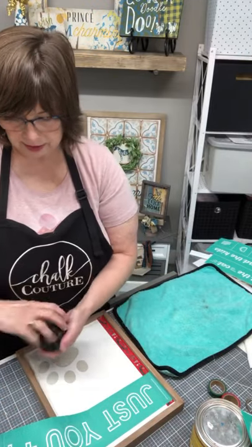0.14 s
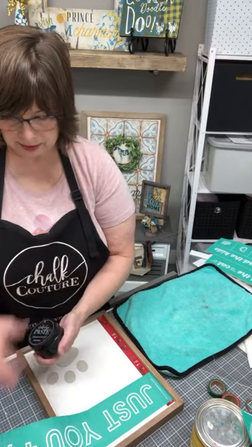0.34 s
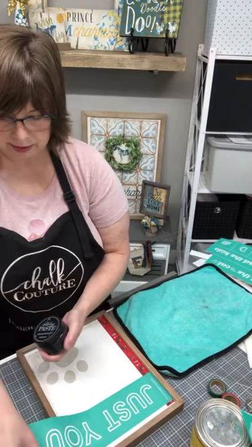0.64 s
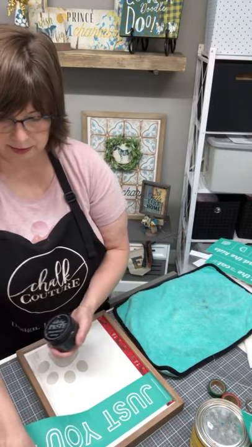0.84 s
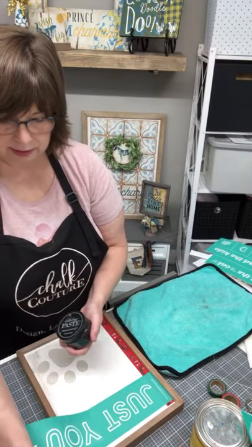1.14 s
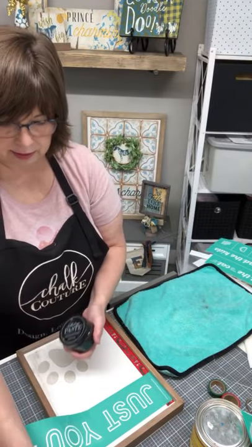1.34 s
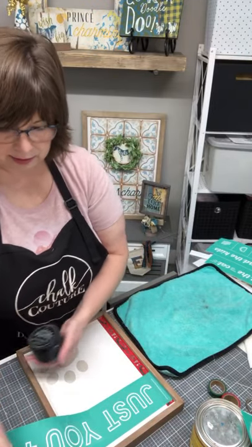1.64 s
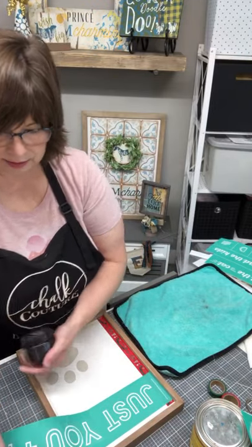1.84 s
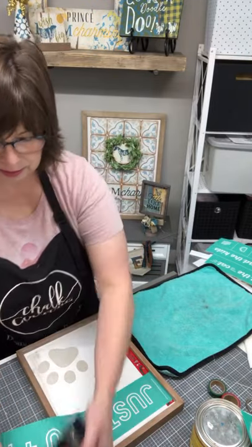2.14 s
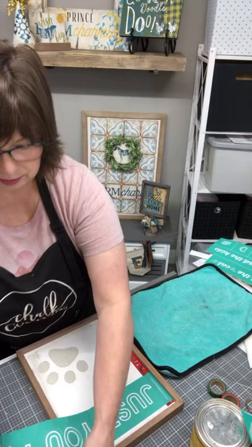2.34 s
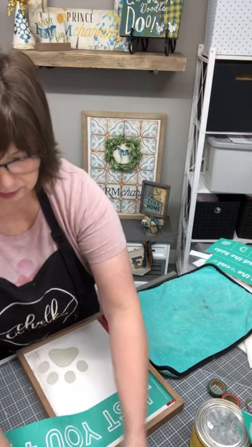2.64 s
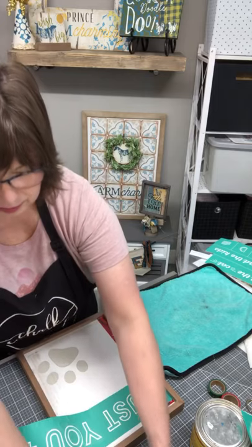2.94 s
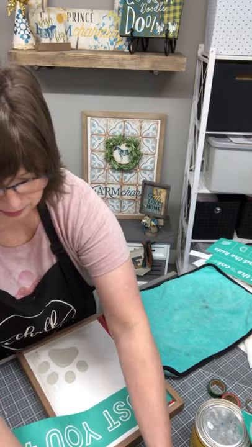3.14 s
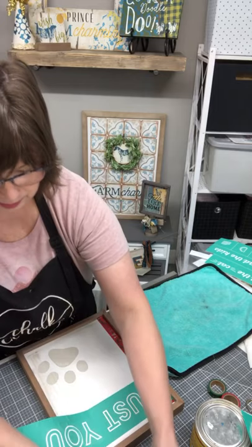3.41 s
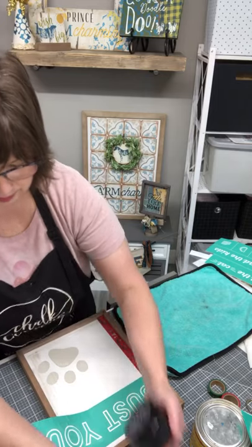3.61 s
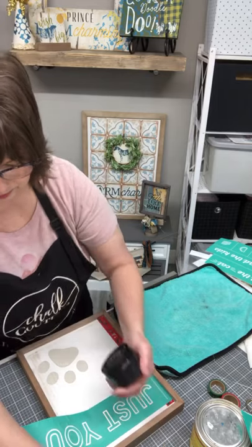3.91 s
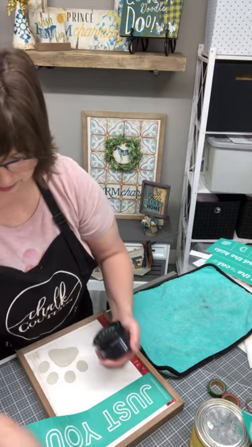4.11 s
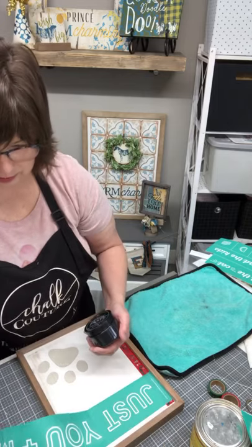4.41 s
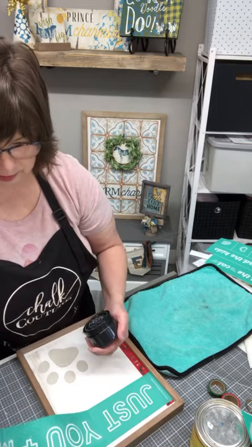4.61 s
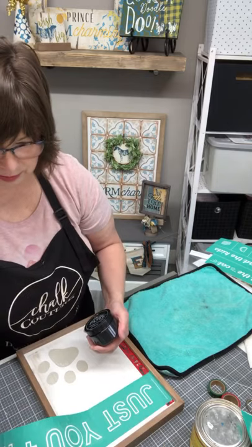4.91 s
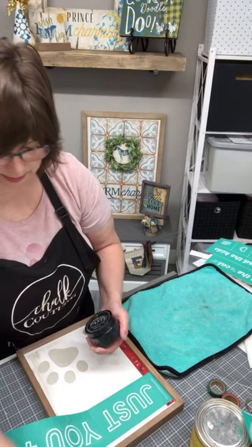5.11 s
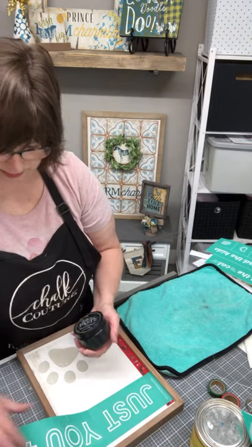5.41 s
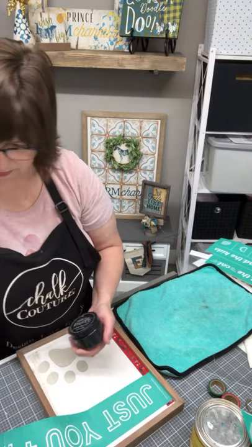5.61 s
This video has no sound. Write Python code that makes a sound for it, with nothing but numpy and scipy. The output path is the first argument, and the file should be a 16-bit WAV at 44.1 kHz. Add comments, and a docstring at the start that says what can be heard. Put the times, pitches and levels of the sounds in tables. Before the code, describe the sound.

A close microphone in a small, quiet room picks up hands handling a plastic jar over a craft table. Faint finger contact and dull bumps come within the first 0.2 seconds, followed by near-quiet. Around 1.05 to 1.3 seconds there are more soft bumps, a weak click and gentle rubbing, then barely audible sleeve movement until about 2. From 2.15 to 2.7 seconds something slides with a low grainy rasp, and at 2.77 it is put down with a solid table knock and short scuff. Between 3 and 4.3 seconds, light dry hand brushes and small bumps come and go. A short stronger slide near 4.5 leads to the loudest event at 4.63: one sharp, bright plastic snap with a brief room tail. From 4.85 to 5.33 irregular stick-slip clicks, clustered at first, mix with finger rubs. Only faint room air remains to about 6 seconds.

```python
"""Soft rubs and bumps of fingers on a small plastic paste jar over a craft table in a small room;
something slides and is put down with a knock, a hand brushes the work surface, then the plastic
gives one sharp snap and a run of stick-slip clicks as the lid shifts in the grip.
Friction is random slips shaped by stroke envelopes; knocks and clicks are sums of dying modes;
bumps are short low cycles; the snap is a causal pulse. A noise tail and low modes form the room."""
import sys
import numpy as np
from scipy import signal
from scipy.fft import rfft, irfft
from scipy.io import wavfile
from scipy.ndimage import uniform_filter1d

SR = 44100
rng = np.random.default_rng(int(sys.argv[2]) if len(sys.argv) > 2 else 0)


def put_to_file(sound):
    """Save the sound as 16-bit audio at rate SR, in the file named by the first command-line argument."""
    columns = np.atleast_2d(sound).T  # one column per channel
    safe = np.clip(columns, -1, 1)
    whole_steps = np.round(safe * 32767)
    wavfile.write(sys.argv[1], SR, whole_steps.astype(np.int16))


N = 253937
TIME_S = np.arange(N) / SR

# Quiet air of the room. Each row: frequency in Hz, relative level in dB.
AIR_SPECTRUM = [(15, -44), (25, -19), (40, -9), (80, -4.5), (149, -10.5), (170, -10.5), (249, -11),
                (405, -11), (796, -16), (911, -15.5), (1100, -19.5), (2610, -23), (3820, -25), (5140, -24),
                (16000, -33.5)]
# Decay of the room tail. Each row: frequency in Hz, T60 in s.
ROOM_T60 = [(150, 0.31), (500, 0.24), (1500, 0.4), (4000, 0.33), (8000, 0.27), (15000, 0.25)]
# Colour of the room tail. Each row: frequency in Hz, relative level in dB.
ROOM_COLOUR = [(100, -8), (250, 3), (450, 2), (700, 3.5), (1500, -2), (3000, -8.5), (7000, -1.5),
               (15000, -2.5)]
# Low standing waves of the room. Each row: frequency in Hz, gain before high-pass in dB, T60 in s.
ROOM_MODES = [(162, -64, 0.39), (210.3, -59.5, 0.73), (241.3, -55, 0.29), (293, -58.5, 0.18),
              (353.6, -47, 0.17), (446.4, -37, 0.22), (483, -60, 0.3), (559.3, -51, 0.35)]

# Sleeve moving as the arm reaches out.
# Each row: end of attack in seconds, speeding up in s, slowing down in s, level in dB.
SLEEVE_STROKES = [(1.53, 0.03, 0.061, -70.5), (1.78, 0.17, 0.13, -64.5)]
# Skin brushing a dry sheet. Each row: end of attack in seconds, speeding up in s, slowing down in s,
# soft rub in dB before trim, fine hiss in dB before trim.
BRUSH_STROKES = [(0.0, 0.0092, 0.12, -65, -51.5), (.735, 0.0088, 0.19, -64.5, -67),
                 (2.838, 0.0021, 0.026, -44.5, -66), (3.252, 0.009, 0.056, -55.5, -56.5),
                 (3.42, 0.07, 0.078, -51, -61), (3.595, 0.035, 0.04, -60, -47.5),
                 (3.69, 0.034, 0.011, -52, -62), (3.778, 0.043, 0.0075, -56.5, -73),
                 (4.19, 0.023, .005, -55, -51), (4.238, 0.0079, 0.036, -52.5, -74),
                 (4.49, 0.11, .005, -67, -62)]
# Brushed sheet. Each row: frequency in Hz, relative level in dB.
BRUSH_SPECTRUM = [(600, -9.5), (1500, -4.5), (2500, 2.5), (4000, 0), (5500, -3.5), (7400, -4.5),
                  (9000, -11.5), (12500, -10), (16000, -21)]
# Short catches of a finger or an edge.
# Each row: start in seconds, length in s, rms before taper in dB, centre in Hz, width in octaves.
SCUFFS = [(.005, 0.041, -64, 2000, 0.1), (0.804, 0.014, -59.5, 1470, 0.83), (2.223, 0.024, -47, 2720, 0.22),
          (2.681, 0.046, -57, 3830, 0.19), (2.833, 0.017, -45.5, 3760, 0.86),
          (2.871, 0.015, -50, 4030, 0.58), (3.024, 0.0077, -59.5, 1900, 0.4),
          (3.466, 0.021, -54.5, 3200, 0.6), (3.533, 0.041, -50.5, 1590, 0.43),
          (3.559, 0.028, -52, 2300, 0.42), (3.707, 0.035, -56, 3600, 0.38),
          (4.24, 0.017, -60.5, 3160, 0.67), (4.371, 0.0061, -60.5, 9500, 0.52),
          (4.408, 0.026, -62, 2220, 0.56), (4.527, 0.053, -51.5, 1780, 0.77), (4.569, 0.016, -53, 7500, .7)]
# Sliding over the table. Each row: end of attack in seconds, speeding up in s, slowing down in s,
# rasp in dB before trim, body in dB before trim.
SLIDE_STROKES = [(0.0, 0.007, 0.068, -62, -54), (2.19, 0.041, 0.049, -49.5, -54),
                 (2.31, 0.014, 0.041, -57, -56.5), (2.395, 0.008, 0.077, -52, -54),
                 (2.49, 0.081, 0.061, -49.5, -50.5), (2.63, 0.019, 0.092, -50.5, -51.5),
                 (2.865, .012, 0.018, -44, -51), (4.335, 0.045, 0.011, -54.5, -84),
                 (4.495, 0.062, 0.016, -43.5, -57)]
# Rasp of sliding. Each row: frequency in Hz, relative level in dB.
RASP_SPECTRUM = [(350, -33), (600, -5), (661, -7), (717, -6.5), (1350, -3.5), (1960, -1.5), (2440, -1.5),
                 (4110, -4.5), (4910, -10), (11500, -30), (16000, -36)]
# Body shaken by the slips. Each row: frequency in Hz, relative level in dB.
BODY_SPECTRUM = [(70, -37), (150, -11), (230, -1.5), (350, 1), (450, 0.5), (560, -9), (800, -8.5),
                 (1500, -30.5), (3000, -39)]
# Fingers dragging on the lid. Each row: end of attack in seconds, speeding up in s, slowing down in s,
# rasp in dB before trim, jar body in dB before trim.
RUB_STROKES = [(1.055, 0.019, 0.046, -56, -51.5), (1.14, 0.037, 0.063, -58.5, -56.5),
               (1.255, 0.013, 0.069, -58, -60.5), (4.815, 0.025, .01, -63, -78),
               (4.86, 0.041, 0.11, -48.5, -54.5), (5.09, 0.01, 0.012, -48.5, -53),
               (5.16, 0.013, 0.058, -52, -58), (5.255, 0.048, 0.017, -52, -51.5)]
# Finger drag. Each row: frequency in Hz, relative level in dB.
RUB_SPECTRUM = [(500, -43), (1000, 0), (2100, -3.5), (2600, 2), (3150, 0.5), (3600, -5), (5000, -8),
                (8000, -20.5), (16000, -57.5)]
# Lid rim singing under the fingers. Each row: frequency in Hz, relative level in dB, T60 in s.
RIM_MODES = [(2800, 0, .005)]
RIM_DB = -10  # against the rasp of the rub

# Stroke shapes by kind. Each holds: attack in s, swell in dB, ease in dB, release in s.
SLEEVE_SHAPE = (0.13, 8.1, 3.9, 0.18)
BRUSH_SHAPE = (0.029, 3.3, 9.1, 0.03)
SLIDE_SHAPE = (0.057, 8.1, 7.3, 0.058)
RUB_SHAPE = (0.041, 2.1, 4.9, 0.067)
SILENT_DB = -39  # below its peak, where a stroke ends

# Dull bumps of the hand against jar and table; the last row is the jar recoiling just after the snap. # Each
# row: start in seconds, envelope peak before high-pass in dB, centre in Hz.
BUMPS = [(.111, -37.5, 410), (.1455, -38, 358), (.163, -51, 410), (1.052, -46.5, 223), (1.08, -42, 257),
         (1.168, -45, 280), (1.200, -40.5, 346), (2.245, -40, 340), (2.325, -44.5, 342), (3.022, -49, 216),
         (3.253, -45, 316), (3.453, -49.5, 295), (3.777, -50.5, 310), (4.240, -48.5, 340),
         (4.252, -44, 276), (4.631, -36.5, 259)]
# Hard blows that reach the table. Each row: start in seconds, peak in dB, brightness in dB per octave.
KNOCKS = [(0.015, -43, 0.5), (0.107, -43, 4), (1.070, -43.5, -4), (2.156, -43, 6.5), (2.77, -24, 2.5),
          (2.817, -38, 0), (3.026, -51, 0.5)]
# Table top. Each row: frequency before pitch factor in Hz, relative level in dB, T60 in s.
TABLE_MODES = [(237, -3.5, 0.027), (398, -8.5, 0.048), (540, -4, 0.032), (713, -3, 0.03),
               (869, -2.5, 0.022), (1080, -6.5, 0.039), (1293, -5, 0.01), (1620, 0.5, 0.0069),
               (1995, -1, 0.006), (3200, -1.5, 0.0029), (4800, -9.5, 0.0056), (6700, -11, 0.0018)]
KNOCK_SEND_DB = 0.7  # into the room

# Plastic clicks. Each row: start in seconds, peak in dB, factor on the lid's pitch.
CLICKS = [(1.046, -45.5, 0.79), (2.182, -38.5, 0.99), (4.694, -33.5, 0.88), (4.8451, -20, 0.906),
          (4.8964, -22.5, 1), (4.912, -25, 0.91), (4.9216, -17, 0.93), (4.9287, -14.5, 1.03),
          (4.9331, -25.5, 0.83), (5.010, -35.5, 0.87), (5.034, -43, .97), (5.086, -38, 0.96),
          (5.0906, -23.5, 0.93), (5.1551, -37, 0.81), (5.1626, -27, 0.95), (5.1857, -28, 1.06),
          (5.2179, -35, 0.92), (5.2493, -21.5, 1.136), (5.2618, -27, 1.05), (5.283, -23.5, 0.96),
          (5.325, -29, .87)]
# Hand-damped lid and jar. Each row: frequency before pitch factor in Hz, relative level in dB, T60 in s.
LID_MODES = [(346, -25.5, 0.017), (520, -23.5, 0.017), (1190, -23.5, 0.02), (2512, 1.5, 0.0083),
             (3074, 12, 0.006), (4080, 3.5, 0.0051), (4640, 4.5, 0.0057), (6530, -8.5, 0.0093),
             (7530, -8.5, 0.0074), (10010, -36, 0.0017)]
# Filled jar's answer to a slip. Each row: frequency in Hz, relative level in dB, T60 in s.
JAR_MODES = [(334, -1.5, 0.037), (447, 1, 0.034)]
# Weaker slips are duller: tilt falls with peak level.
HARD_CLICK_DB, HARD_TILT_DB_PER_OCT, TILT_PER_DB = -17.5, 2.5, 0.55
THUD_GAIN_DB, THUD_PER_DB = -43.5, 1.2  # gain at a hard click; thud dB per click dB
REBOUND_MEAN_S, REBOUND_DB = 0.001002, -10.5  # the plastic catches again after each slip
CLICK_SEND_DB = -5  # into the room
TWIST_S = (4.88, 5.32)  # faint slips fall between the clicks while the lid turns
FAINT_PER_S, FAINT_DB, FAINT_SPREAD_DB = 25, -42, 4
# Lid's snap. Each row: frequency in Hz, relative level in dB.
SNAP_SPECTRUM = [(60, -46), (170, -22), (300, -13), (600, -12), (1200, -13), (2100, -14), (2650, -4),
                 (3250, 3), (3900, 1), (5000, -4), (7700, -5), (9500, -13), (12500, -19), (16000, -27)]

AIR_RMS_DB = -69  # before the microphone
EDGE_HZ = 15900


def amp(db):
    """Decibels to gain."""
    return 10 ** (np.asarray(db) / 20)


def unit(x):
    """Scales to rms 1."""
    return x / np.sqrt(np.mean(x ** 2) + 1e-20)


def read(points, hz):
    """Reads a table on a log-frequency axis."""
    f, value = np.transpose(points)
    return np.interp(np.log(hz + 1), np.log(f + 1), value)


def add(mix, start_s, sound):
    """Mixes a sound in at start_s."""
    part = mix[max(round(start_s * SR), 0):][:len(sound)]
    part += sound[:len(part)]


def colour(x, spectrum):
    """Filters a signal by (Hz, dB) points."""
    gain = amp(read(spectrum, np.fft.rfftfreq(len(x), 1 / SR)))
    return irfft(rfft(x) * gain, len(x))


def highpass(x, order, hz):
    """Removes bass below hz."""
    return signal.sosfilt(signal.butter(order, hz, "high", fs=SR, output="sos"), x)


def ring(modes, pitch=1, tilt_db_per_oct=0):
    """Sum of dying modes, neighbours in opposite sense; tilt is relative to the first mode."""
    t = np.arange(SR // 2) / SR
    swing = np.zeros(len(t))
    for k, (hz, db, t60_s) in enumerate(modes):
        tilt_db = tilt_db_per_oct * np.log2(hz / modes[0][0])
        decay = amp(db + tilt_db - 60 * t / t60_s)
        swing += (-1) ** k * decay * np.sin(2 * np.pi * hz * pitch * t)
    return highpass(swing, 3, 170)  # small things radiate little bass


def grit(size, per_s, spread_db, smooth):
    """Friction: tiny slips of uneven size over a smooth hiss."""
    hits = rng.random(size) < per_s / SR
    signs = rng.choice([-1, 1], size)
    sizes = amp(spread_db * np.minimum(rng.exponential(1, size), 2))
    return unit(unit(hits * signs * sizes) + smooth * rng.standard_normal(size))


def follow(strokes, column, shape):
    """Stroke gain: friction takes hold, swells with speed to one dB column, eases as it slows, lets go."""
    attack_s, swell_db, ease_db, release_s = shape
    gain = np.zeros(N)
    for row in strokes:
        start_s, rise_s, fall_s = row[:3]
        corners_s = start_s - attack_s + np.cumsum([0, attack_s, rise_s, fall_s, release_s])
        level_db = np.interp(TIME_S, corners_s, [SILENT_DB, -swell_db, 0, -ease_db, SILENT_DB])
        gain += amp(row[column]) * (amp(level_db) - amp(SILENT_DB))
    return gain


def pulse(spectrum, size=4096):
    """Causal click of peak 1; its minimum phase comes from the log spectrum."""
    log_gain = np.log(amp(read(spectrum, abs(np.fft.fftfreq(size, 1 / SR)))))
    response = np.exp(np.conj(signal.hilbert(log_gain)))
    click = np.fft.ifft(response).real[:size // 2]
    return click / abs(click).max()


def air():
    """Quiet room air: steady coloured noise."""
    return amp(AIR_RMS_DB) * unit(colour(rng.standard_normal(N), AIR_SPECTRUM))


def room(x):
    """Dense noise tail that dies band by band."""
    taps = rng.standard_normal(SR // 2)
    hz, t, z = signal.stft(taps, SR, nperseg=256)
    decay_db = 60 * t / read(ROOM_T60, hz)[:, None]
    gain = amp(read(ROOM_COLOUR, hz)[:, None] - decay_db)
    tail = signal.istft(z * gain, SR, nperseg=256)[1][:len(taps)]
    build = np.clip(np.arange(len(taps)) / SR / 0.00056, 0, 1)  # 0.56 ms fade-in
    return signal.fftconvolve(x, amp(-31.0) * tail * build)[:N]


def standing_waves(x):
    """Low room modes ring on after the sound that drives them."""
    return signal.fftconvolve(x, ring(ROOM_MODES))[:N]


def uneven_slips():
    """Stick-slip grit whose strength wanders in uneven catches."""
    wander = uniform_filter1d(rng.standard_normal(N), size=300)
    wander = unit(uniform_filter1d(wander, size=200))
    return grit(N, per_s=900, spread_db=1, smooth=0.74) * amp(2 * wander.clip(-2, 2))


def sleeve(slips):
    """Sleeve movement: slow strokes of rasp-coloured slips."""
    return follow(SLEEVE_STROKES, 3, SLEEVE_SHAPE) * unit(colour(slips, RASP_SPECTRUM))


def brushes():
    """Fine dry friction, split at 5 kHz into a soft rub and a hiss with separate stroke levels."""
    friction = unit(colour(grit(N, per_s=2500, spread_db=1.5, smooth=0.25), BRUSH_SPECTRUM))
    low = signal.sosfilt(signal.butter(1, 5000, fs=SR, output="sos"), friction)
    soft_rub = follow(BRUSH_STROKES, 3, BRUSH_SHAPE) * low
    fine_hiss = follow(BRUSH_STROKES, 4, BRUSH_SHAPE) * (friction - low)
    return amp(-2.0) * (soft_rub + fine_hiss)


def scuffs():
    """Brief swells of coarse slips, each in its own band."""
    out = np.zeros(N)
    for start_s, length_s, db, hz, octaves in SCUFFS:
        size = int(length_s * SR)
        away = np.log2((np.fft.rfftfreq(size, 1 / SR) + 1) / hz) / octaves
        slips = grit(size, per_s=1800, spread_db=2.5, smooth=0.35)
        rub = irfft(rfft(slips) / (1 + away ** 2), size)
        add(out, start_s, amp(db) * unit(rub) * signal.windows.tukey(size, .5))
    return out


def slides(slips):
    """Sliding over the table rasps, and the same slips shake the body under it."""
    rasp = unit(colour(slips, RASP_SPECTRUM))
    body = unit(colour(slips, BODY_SPECTRUM))
    rasp_part = amp(-3.5) * follow(SLIDE_STROKES, 3, SLIDE_SHAPE) * rasp
    return rasp_part + amp(-4) * follow(SLIDE_STROKES, 4, SLIDE_SHAPE) * body


def finger_rubs(slips):
    """Fingers drag on the lid: the slips rasp, sing in the rim and shake the jar's body."""
    rim = unit(signal.fftconvolve(slips, ring(RIM_MODES))[:N])
    drag = unit(colour(slips, RUB_SPECTRUM)) + amp(RIM_DB) * rim
    body = unit(colour(slips, BODY_SPECTRUM))
    drag_part = amp(-4.0) * follow(RUB_STROKES, 3, RUB_SHAPE) * drag
    return drag_part + amp(-6.5) * follow(RUB_STROKES, 4, RUB_SHAPE) * body


def bumps(cycles=0.41):
    """Soft flesh pushes gently, or the jar recoils: a low cycle or two, peaking in envelope after the given
    cycles."""
    out, t = np.zeros(N), np.arange(SR // 10) / SR
    for start_s, db, hz in BUMPS:
        u = t * hz / cycles
        add(out, start_s, amp(db) * u * np.exp(1 - u) * np.cos(2 * np.pi * hz * t))
    return highpass(out, 2, 120)


def knocks():
    """Blows ring the modes of the table top. Returns direct sound and room send."""
    out = np.zeros(N)
    for start_s, db, tilt_db_per_oct in KNOCKS:
        knock = ring(TABLE_MODES, 0.99, tilt_db_per_oct)
        add(out, start_s, knock * amp(db) / abs(knock).max())
    return np.array([out, amp(KNOCK_SEND_DB) * out])


def faint_slips():
    """Random small slips of the turning lid, as rows like those of CLICKS."""
    start_s, end_s = TWIST_S
    span_s = end_s - start_s
    draws = rng.random((round(FAINT_PER_S * span_s), 3))
    return [(start_s + span_s * when, FAINT_DB + FAINT_SPREAD_DB * (2 * size - 1), .85 + .25 * pitch)
            for when, size, pitch in draws]


def clicks():
    """Each slip rings the lid, brighter when harder, and jolts the jar. Returns direct and room send."""
    out, thud = np.zeros(N), ring(JAR_MODES)
    for start_s, db, pitch in list(CLICKS) + faint_slips():
        force_db = db - HARD_CLICK_DB
        click = ring(LID_MODES, pitch, HARD_TILT_DB_PER_OCT + TILT_PER_DB * force_db)
        click *= amp(db) / abs(click).max()
        rebound_s = REBOUND_MEAN_S * rng.uniform(.5, 1.5)
        add(out, start_s, click)
        add(out, start_s + rebound_s, amp(REBOUND_DB) * click)
        add(out, start_s, amp(THUD_GAIN_DB + THUD_PER_DB * force_db) * thud)
    return np.array([out, amp(CLICK_SEND_DB) * out])


def snap(start_s=4.6287, db=-8, chatter_db=-15.5, chatter_decay_s=.0022, send_db=3):
    """The lid lets go: one crack, then brief decaying chatter. Returns direct sound and room send."""
    crack = amp(db) * pulse(SNAP_SPECTRUM)
    t = np.arange(len(crack)) / SR
    chatter = amp(chatter_db) * rng.standard_normal(len(t)) * np.exp(-t / chatter_decay_s)
    out = np.zeros((2, N))
    add(out[0], start_s, crack)
    add(out[0], start_s + .0003, signal.fftconvolve(chatter, crack))
    add(out[1], start_s, amp(send_db) * crack)  # the room gets the crack alone
    return out


def scene():
    """All handling sounds, their room and its quiet air."""
    slips = uneven_slips()
    soft = sleeve(slips) + brushes() + scuffs() + slides(slips) + finger_rubs(slips) + bumps()
    blows, send = knocks() + clicks() + snap()
    boom = standing_waves(send + amp(-6.5) * soft)
    return (blows + soft + room(send + soft) + boom + air())[None]


def record(dry):
    """The microphone's bass roll-off and the band limit."""
    thin = highpass(dry, 2, 45)
    lowpass = signal.firwin(511, EDGE_HZ, window=("kaiser", 9), fs=SR)
    return signal.oaconvolve(thin, lowpass[None], "same")


dry = scene()
out = record(dry)
put_to_file(out)
```